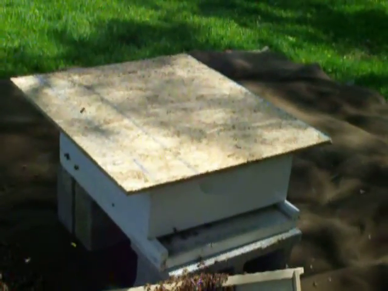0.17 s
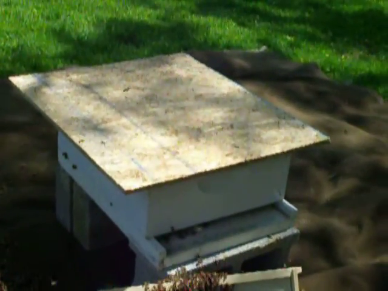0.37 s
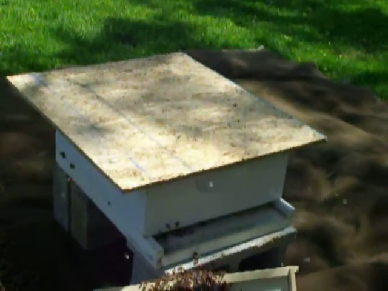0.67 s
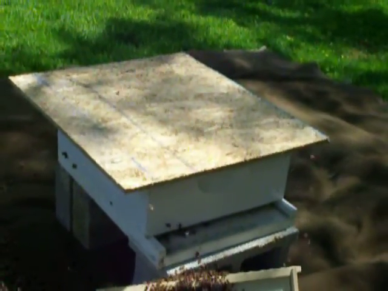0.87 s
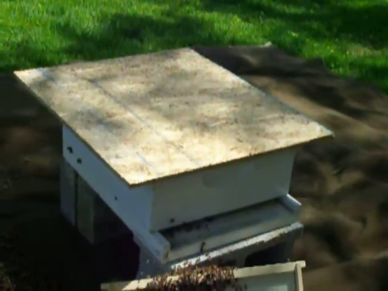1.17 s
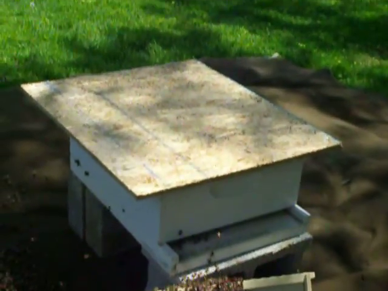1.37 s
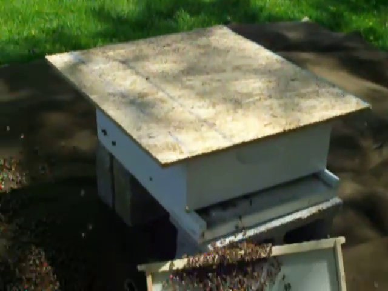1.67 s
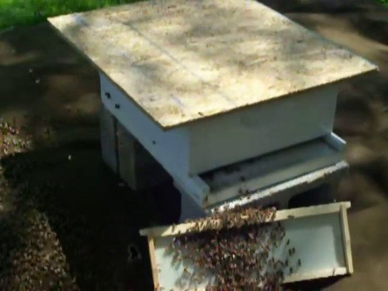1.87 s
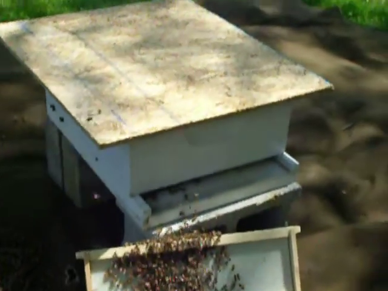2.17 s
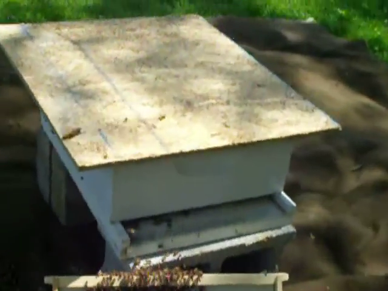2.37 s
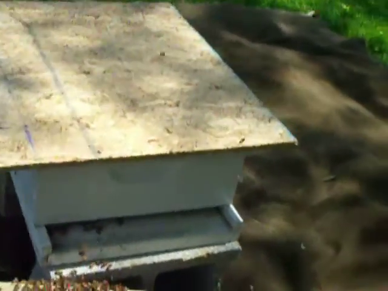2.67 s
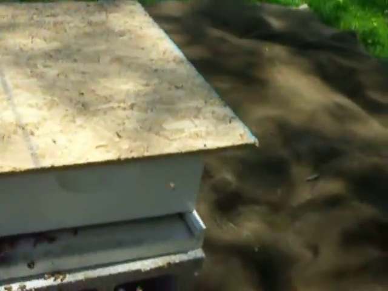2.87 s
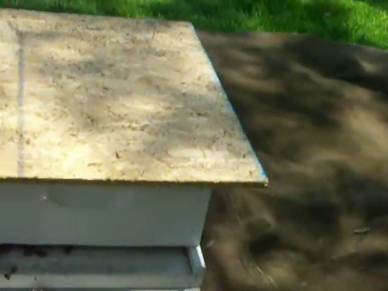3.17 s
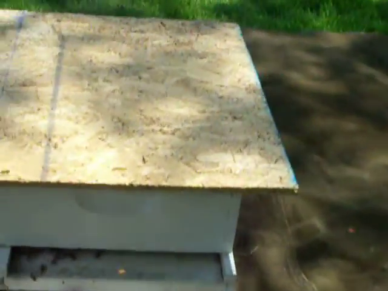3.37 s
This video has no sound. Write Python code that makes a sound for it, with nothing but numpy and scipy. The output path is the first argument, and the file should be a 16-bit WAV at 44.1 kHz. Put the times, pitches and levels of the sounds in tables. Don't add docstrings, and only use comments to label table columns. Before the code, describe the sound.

A bee swarm hums steadily around a wooden hive box outdoors, with fine crawling rustle. A small hissing hand-held camera picks up light finger ticks, then one loud clipped knock midway; the buzz ends closer.

```python
import sys
import numpy as np
from scipy import signal
from scipy.fft import rfft, irfft, next_fast_len
from scipy.io import wavfile
from scipy.ndimage import uniform_filter1d

SR = 44100
rng = np.random.default_rng(int(sys.argv[2]) if len(sys.argv) > 2 else 0)


def gain_from_decibels(decibels):
    exponent = np.asarray(decibels, float) / 20
    return 10 ** exponent


def to_wav(sig):
    pcm = np.clip(np.atleast_2d(sig), -1, 1) * 32767
    pcm = np.round(pcm).astype(np.int16)
    wavfile.write(sys.argv[1], SR, pcm.T)


N = 155673

# time in seconds, level in dB.
SWARM_LEVEL = [
    (0.0, -40.5),
    (0.62, -45),
    (1.22, -43.5),
    (1.72, -36.5),
    (2.19, -40.5),
    (2.51, -38),
    (3.53, -36.5),
]
# multiple of the wingbeat rate, level in dB.
WING_OVERTONES = [(1, -11.5), (2, -0.5), (3, -21), (4, -1.5), (5, 0.5), (6, -2.5), (9, -6.5), (20, -19.5)]
# centre in Hz, width in Hz, gain in dB.
SWARM_COLOUR = [(260, 36, 4.5), (390, 170, 1), (900, 370, 0), (2040, 820, -1.5)]
# frequency in Hz, density in dB per Hz.
HISS_SPECTRUM = [(12, -25), (20, -7), (43, -11.5), (303, -8), (411, -5.5), (954, -4), (2870, -8),
                 (4920, -7), (5400, -8.5), (7020, -49), (11900, -120)]
# frequency in Hz, level in dB.
MOTOR_TONES = [(72, -61.5), (107.8, -62.5), (145, -64), (591, -81)]
# frequency in Hz, level in dB, t60 in seconds.
CASE_MODES = [(120, -27.5, 0.01), (289, -15, 0.046), (808, -14.5, 0.0303), (872, -8.5, 0.04),
              (1153, -9.5, 0.036), (1374, -8.5, 0.027), (1704, -9, 0.025), (2115, -3, 0.019),
              (2294, -3, 0.017), (3000, -10.5, 0.017), (4600, -11.5, .014), (4910, -16, 0.02)]
# start in seconds, peak in dB, centre in Hz, width in Hz, t60 in seconds.
TOUCHES = [(1.2185, -29, 277, 151.6, 0.11), (1.218, -26.5, 1900, 900, .02),
           (1.2201, -27.5, 1000, 585, 0.021), (1.3799, -22.5, 1250, 1106, 0.015),
           (1.383, -29.5, 3300, 693, 0.018), (1.590, -19.5, 1095, 1490, .022),
           (1.7200, -33, 2350, 300, .06), (2.463, -30.5, 280, 303, 0.053), (2.523, -32.5, 660, 200, 0.081),
           (3.028, -28, 400, 600, .04), (3.030, -25, 1900, 2020, 0.026)]

WING_HZ, WING_SPREAD, FAST_SHARE, WANDER, WANDER_PER_S, JITTER = 198.3, 0.05, 0.14, 0.035, 5.0, 0.022
NEAR_DB, NEAR_PER_S, BEAT_DB = 4.5, 4.96, 2.5
RUSTLE_DB, RUMBLE_DB = -47, -49
HISS_DB, HISS_FLICKER_DB, WHINE_HZ, WHINE_DB = -38.5, -0.17, 5011.9, -54
SCAN_HZ, SCAN_AT_S, SCAN_GAP_S, SCAN_DIP = 59.94, 0.0039, 0.0006, 0.5
KNOCK_S, KNOCK_DB, KNOCK_RISE_S = 1.69345, -1.6, 0.00016
SCRAPE_S, SCRAPE_PEAK_S, SCRAPE_DB = 1.71, 0.033, -38.5
SLOW, EDGE_HZ, EDGE_WIDTH_HZ, OFFSET, CLIP = 4, 5520, 1387, -0.0029, 0.712
FOLD_HZ = SR / SLOW / 2


def shaped(x, gain):
    n = next_fast_len(N)
    hz = np.arange(n // 2 + 1) * SR / n + 1e-3
    return irfft(rfft(x, n) * gain(hz), n)[:N]


def level(x, db):
    return x * gain_from_decibels(db) / np.sqrt(np.mean(x ** 2))


def walk(rate, step=1):
    hold, n = int(SR / rate / step), -(-N // step)
    stairs = np.repeat(rng.standard_normal(400), hold)[:n + hold]
    smooth = uniform_filter1d(uniform_filter1d(stairs, hold), hold)
    return smooth[hold // 2:n + hold // 2] * 1.35


def peaks(hz, rows):
    return sum(gain_from_decibels(db) * 1j * hz * w / (f * f - hz * hz + 1j * hz * w) for f, w, db in rows)


def wing_stroke(size):
    k = np.arange(1, 21)
    overtones = gain_from_decibels(np.interp(k, *np.array(WING_OVERTONES).T))
    turn = rng.random(len(k))[:, None] + k[:, None] * np.arange(size) / size
    return overtones @ np.sin(2 * np.pi * turn)


def swarm(count=44):
    bees, size = np.zeros(N), 2048
    for _ in range(count):
        stroke = wing_stroke(size)
        own = WING_SPREAD * rng.standard_normal() + FAST_SHARE * rng.exponential()
        drift = WANDER * walk(WANDER_PER_S, step=SLOW) + JITTER * walk(30, step=SLOW)
        phase = np.cumsum(WING_HZ * (1 + own + drift)) * SLOW / SR
        near_db = NEAR_DB * walk(NEAR_PER_S, step=SLOW) + BEAT_DB * walk(40, step=SLOW)
        bees[::SLOW] += stroke[(phase * size).astype(int) % size] * gain_from_decibels(near_db)
    bees = shaped(bees, lambda hz: peaks(hz, SWARM_COLOUR) * (hz < FOLD_HZ))
    s, db = np.array(SWARM_LEVEL).T
    return level(bees, 0) * gain_from_decibels(np.interp(np.arange(N) / SR, s, db) - 2.0)


def rustle():
    clicks = (rng.random(N) < 0.02) * rng.standard_normal(N) * gain_from_decibels(1.2 * walk(13))
    return level(shaped(clicks, lambda hz: peaks(hz, [(2320, 2500, 11.5), (1000, 800, -0.5)])), RUSTLE_DB)


def knock():
    u = np.maximum(np.arange(N) / SR - KNOCK_S, 0)
    ring = -sum(gain_from_decibels(db) * np.sin(2 * np.pi * hz * u) * 1000 ** (-u / t60) for hz, db, t60 in CASE_MODES)
    ring = ring * (1 - np.exp(-(u / KNOCK_RISE_S) ** 2))
    return gain_from_decibels(KNOCK_DB) * ring / np.abs(ring).max()


def scrape():
    u = np.maximum(np.arange(N) / SR - SCRAPE_S, 0) / SCRAPE_PEAK_S
    grain = rng.standard_normal(N) * gain_from_decibels(1.0 * walk(60))
    grain = shaped(grain, lambda hz: peaks(hz, [(1060, 170, 2.0), (2200, 230, -4), (3200, 600, 6.0)]))
    return level(grain, SCRAPE_DB) * u * np.exp(1 - u)


def ticks():
    out, t = np.zeros(N), np.arange(N) / SR
    for s, db, hz, width, t60 in TOUCHES:
        burst = shaped(rng.standard_normal(N), lambda f: peaks(f, [(hz, width, 0)]) ** 2)
        burst = burst * (t > s) * 1000 ** (-np.maximum(t - s, 0) / t60)
        out += gain_from_decibels(db) * burst / np.abs(burst).max()
    return out


def camera():
    t = np.arange(N) / SR
    f, db = np.array(HISS_SPECTRUM).T
    hiss = shaped(rng.standard_normal(N),
                  lambda hz: gain_from_decibels(np.interp(np.log(hz), np.log(f), db)) * (hz < FOLD_HZ))
    hiss = level(hiss, HISS_DB) * gain_from_decibels(HISS_FLICKER_DB * walk(12))
    whine = gain_from_decibels(WHINE_DB + 3) * np.sin(2 * np.pi * WHINE_HZ * t)
    from_scan = (((t - SCAN_AT_S) * SCAN_HZ + 0.5) % 1 - 0.5) / SCAN_HZ
    dip = 1 - SCAN_DIP * np.exp(-(from_scan / SCAN_GAP_S) ** 2)
    return dip * (hiss + whine)


def distance():
    t = np.arange(N) / SR
    air = shaped(rng.standard_normal(N), lambda hz: peaks(hz, [(91.4, 280, 0)])) * gain_from_decibels(0.96 * walk(2.5))
    motors = sum(gain_from_decibels(db + 1.5 + 2.6 * walk(2.3)) * np.sin(2 * np.pi * f * t) for f, db in MOTOR_TONES)
    return level(air, RUMBLE_DB) + motors


def scene():
    mono = swarm() + rustle() + knock() + scrape() + ticks() + camera() + distance()
    return np.tile(mono, (2, 1))


def top_cut(x):
    return signal.sosfilt(signal.butter(12, 16500, fs=SR, output="sos"), x)


def record(dry):
    x = shaped(dry[0], lambda hz: hz < FOLD_HZ)
    x = x * SLOW * (np.arange(N) % SLOW == 0)
    x = shaped(x, lambda hz: np.sin(np.pi / 2 * np.clip(0.5 - (hz - EDGE_HZ) / EDGE_WIDTH_HZ, 0, 1)) ** 2
               + gain_from_decibels(-39) * (hz < 6300))
    x = np.clip(x + OFFSET, -CLIP, CLIP)
    return top_cut(np.tile(x, (2, 1)))


dry = scene()
out = record(dry)
to_wav(out)
```